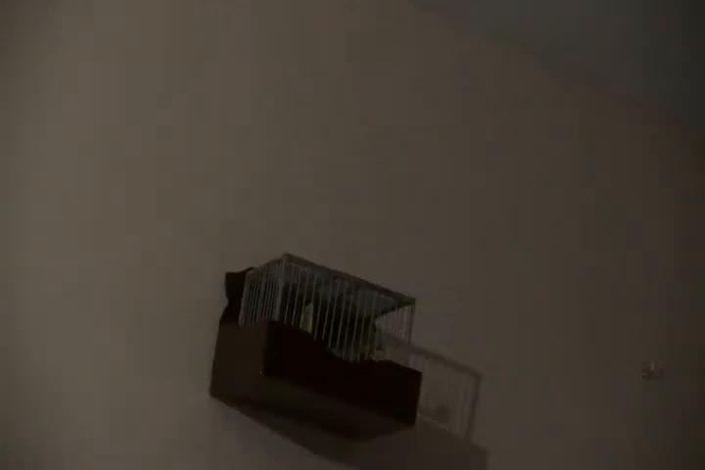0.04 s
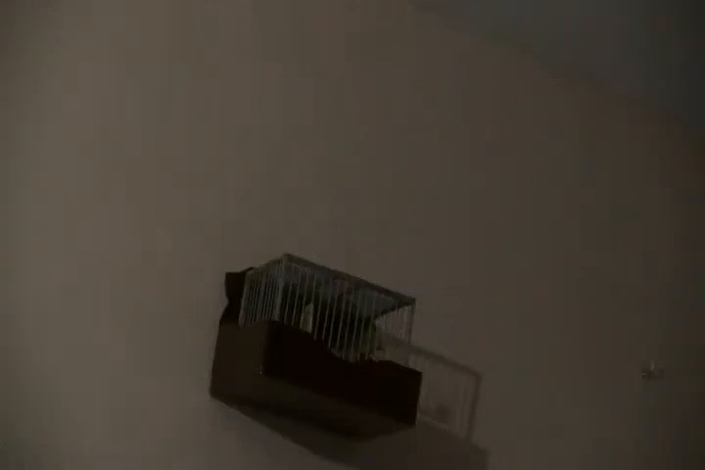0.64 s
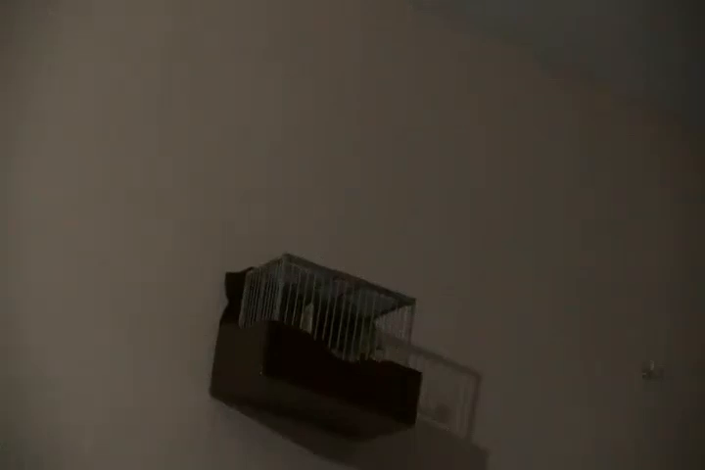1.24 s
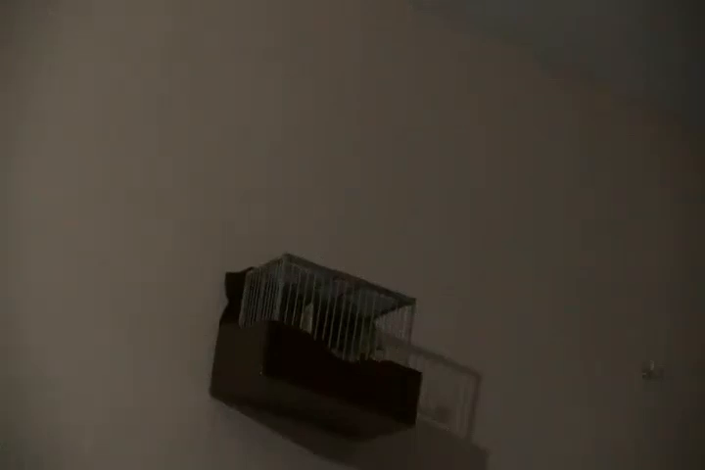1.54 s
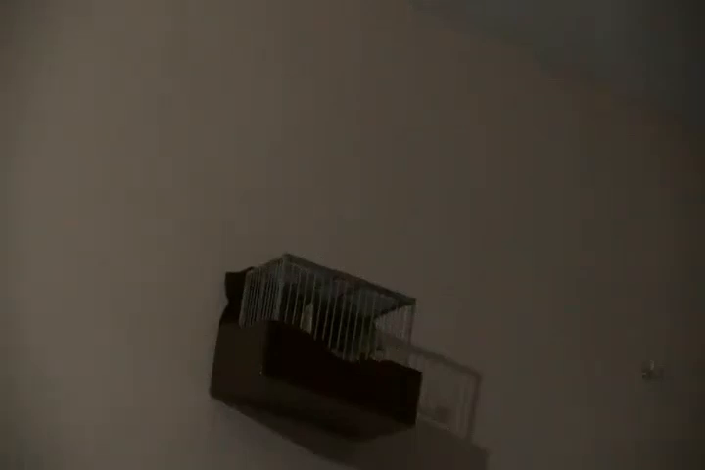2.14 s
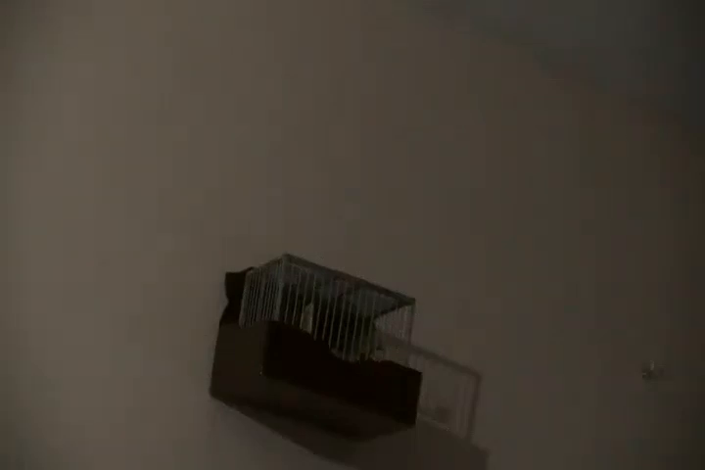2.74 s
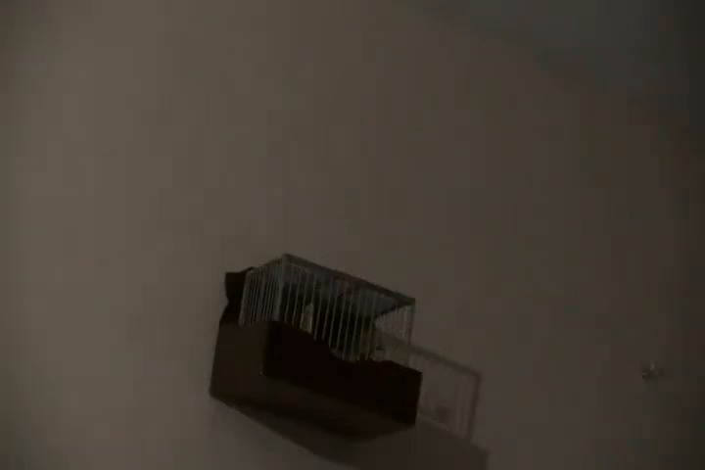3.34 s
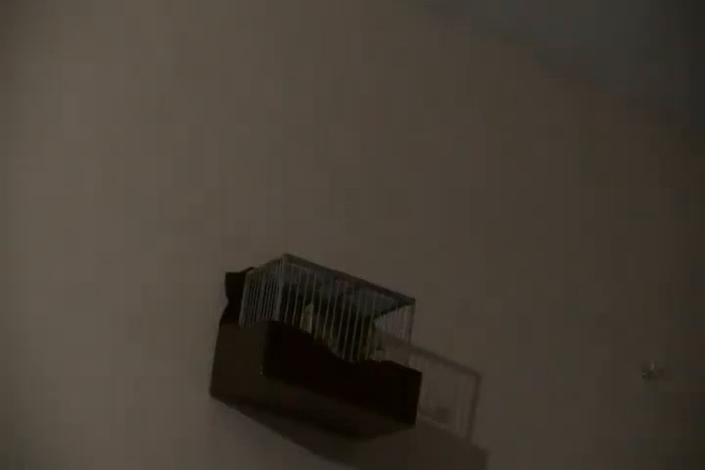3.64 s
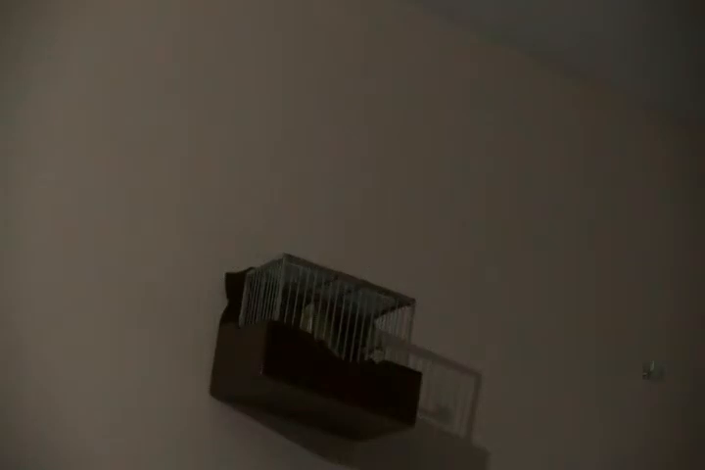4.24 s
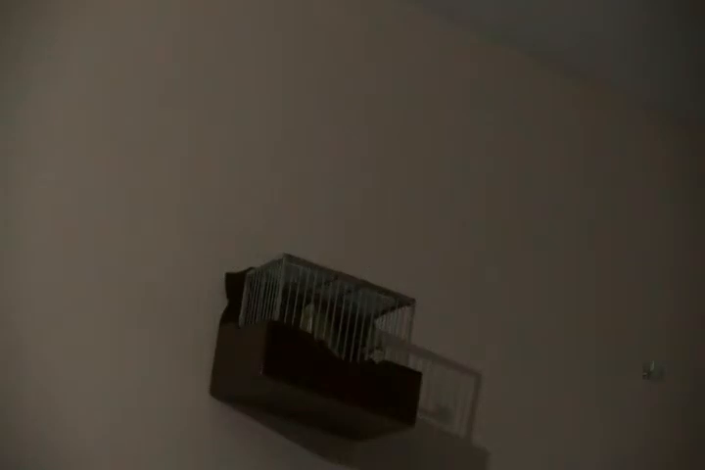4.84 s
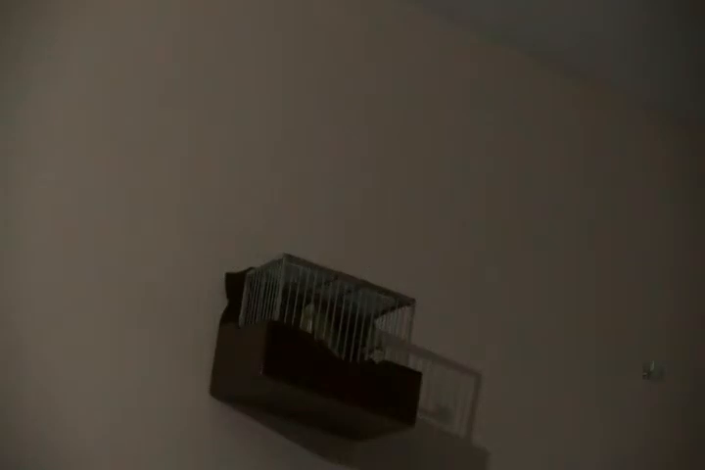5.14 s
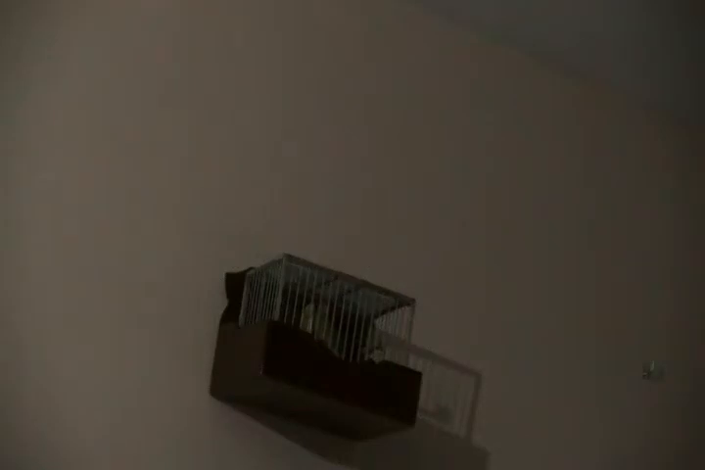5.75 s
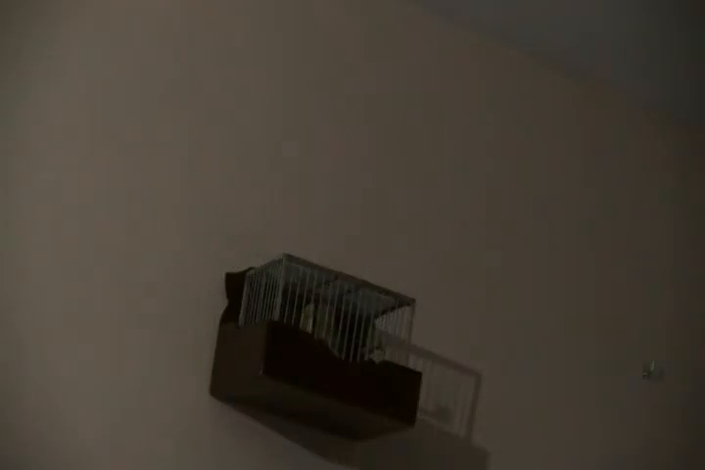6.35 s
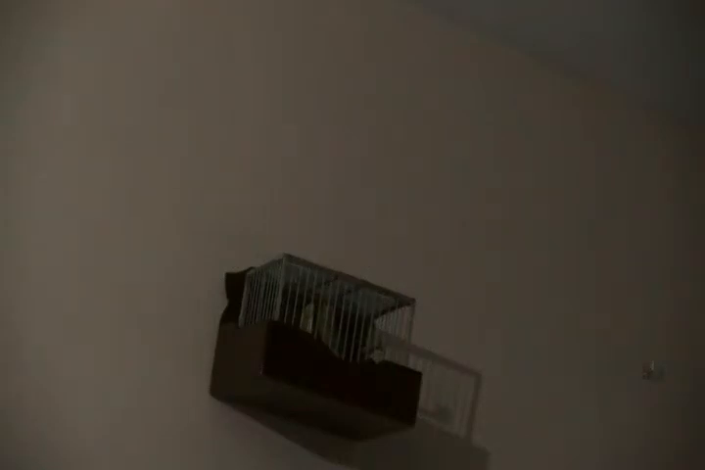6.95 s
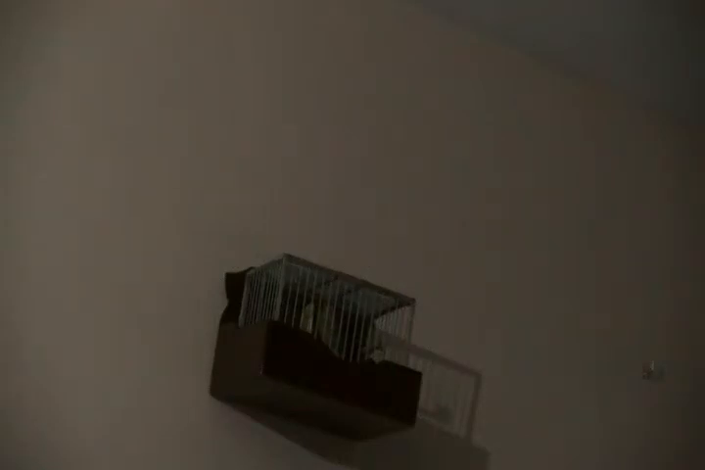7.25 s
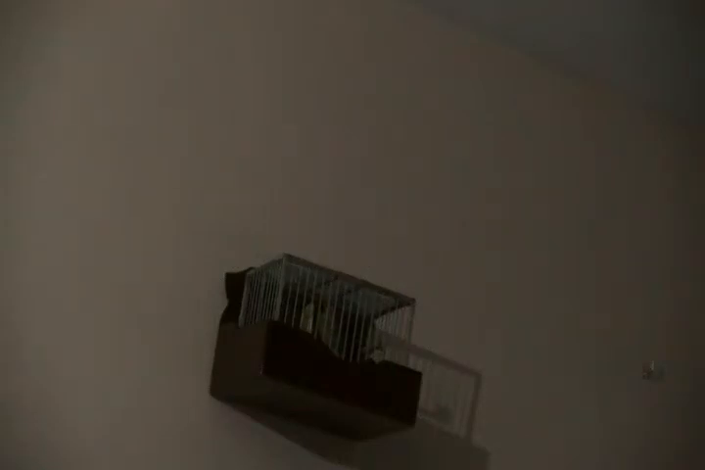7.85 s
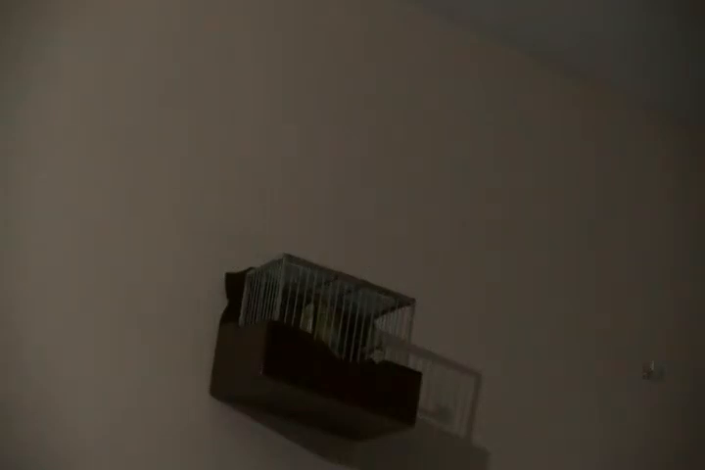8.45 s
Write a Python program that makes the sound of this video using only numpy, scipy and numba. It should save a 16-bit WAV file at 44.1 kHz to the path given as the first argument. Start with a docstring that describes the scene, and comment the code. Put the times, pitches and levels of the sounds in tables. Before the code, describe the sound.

A caged songbird sings short, high chips and downward-sliding notes, growing louder in an echoing room, with a fainter bird chirping farther off.

```python
"""A bare, echoing room with a steady rumble and mains hum. A far bird chirps softly, and a caged
songbird sings chip-and-whistle pairs, then loud notes that slide down, with a few small ticks.
Each note is one gliding tone from the bird's voice organ, which the walls smear into a wash.
A camera's gain control turns the whole room down under every loud note."""
import sys
import numpy as np
from scipy import signal
from scipy.fft import rfft, irfft, next_fast_len
from scipy.io import wavfile
from scipy.ndimage import uniform_filter1d, minimum_filter1d, map_coordinates
from numba import njit

SR = 44100
rng = np.random.default_rng(int(sys.argv[2]) if len(sys.argv) > 2 else 0)


def store_wav(level_fs):
    """Save 16-bit WAV to argv[1]."""
    pcm = np.round(np.clip(np.atleast_2d(level_fs), -1, 1) * 32767)
    wavfile.write(sys.argv[1], SR, pcm.T.astype(np.int16))


N = 374708
TIME = np.arange(N) / SR

# How alike the left and right sides sound: frequency_hz, likeness (1 = the same)
STEREO_LIKENESS = [(100, .99), (500, 0.98), (1200, .88), (3000, 0.83), (8000, 0.4), (12000, 0.12)]
# Tone colour of the room's rumble: frequency_hz, gain_db
RUMBLE_COLOUR = [(20, -20), (31, -9.5), (40, 4), (52, -2), (95, -2), (135, -1), (170, -4.5), (380, -6.5),
                 (550, -12), (1160, -17), (3000, -23.5), (5200, -25), (9800, -36), (12800, -46)]
# Tones of a mains-driven motor: pitch_hz, relative_level_db
HUM_TONES = [(199.2, -44), (349.9, -48), (500.6, -48), (597.5, -49), (802.1, -53.5), (899.0, -61),
             (952.8, -69.5), (1050, -63.5), (1599, -57)]
# Time the room's echo takes to fade by 60 dB, before any stretching: frequency_hz, fade_s
ECHO_FADE = [(3500, 0.59), (5500, 0.55), (8500, 0.46), (12000, 0.33)]
# The far bird's two-humped chirps: start_s, length_s, level_db, top_hz, low_hz
FAR_CHIRPS = [(.0, 0.15, -36, 6350, 3724), (0.8, .16, -36, 6450, 3880), (1.25, 0.1, -46.5, 4940, 3400),
              (1.751, 0.16, -35, 6540, 3900), (2.333, 0.067, -47.5, 4740, 3390),
              (2.755, .16, -35, 6340, 3900), (3.605, .16, -35.5, 6240, 3850),
              (4.394, 0.12, -33.5, 6350, 4040), (7.122, .14, -35, 6360, 3900),
              (8.058, 0.098, -35, 6310, 3850)]
# Tone colour of the path from the far bird: frequency_hz, gain_db
FAR_COLOUR = [(3500, 2.5), (4000, 4), (4450, 2), (4950, 5), (5350, 4.5), (5800, 9), (6050, 0), (6400, 0.5),
              (8000, -3)]
# Brief ticks and scuffs: start_s, level_db, fade_s (time to fall by 60 dB)
TICKS_AND_SCUFFS = [(0.506, -40, 0.073), (3.921, -33.5, 0.18), (3.962, -13, 0.0024), (5.203, -14.5, 0.002),
                    (6.341, -21, 0.002), (7.729, -10, 0.002)]
# Tone colour of the ticks and of the rasp in each note: frequency_hz, gain_db
RASP_COLOUR = [(1000, -11), (4000, 0), (7000, -1), (10500, 6), (13000, -19)]
# Short high chips: start_s, length_s, level_db, overtone_db, start_hz, crest_hz, end_hz
CHIP_NOTES = [(3.015, 0.023, -8.5, -15, 7030, 7400, 5550), (3.411, 0.034, -2.5, -22, 8170, 8520, 6180),
              (3.905, 0.032, -7, -25, 7580, 7760, 6660), (4.443, 0.036, 2, -31, 7230, 7800, 6610),
              (4.742, 0.029, 7, -31, 7300, 7880, 6610), (5.286, 0.023, 7, -55, 7450, 8410, 7980),
              (5.800, .037, 6.5, -35, 8640, 8910, 7900), (6.439, .017, 9.5, -49, 6720, 8725, 7800),
              (7.059, 0.041, 11, -39.5, 8760, 8870, 7860), (7.788, 0.022, 10.5, -44, 7450, 8470, 8320),
              (8.317, .038, 13.5, -33, 9040, 9200, 8190)]
# Lower, held whistles: start_s, length_s, level_db, overtone_db, start_hz, crest_hz, end_hz
WHISTLE_NOTES = [(3.055, 0.011, -7.5, -13.5, 5020, 5750, 5170), (3.447, 0.048, -8, -19, 4960, 5760, 5320),
                 (3.948, 0.013, -4, -21, 4850, 5610, 5155), (4.475, 0.038, -3.5, -31, 5010, 5730, 5243),
                 (4.786, .035, 1, -25, 5400, 5730, 5585), (5.181, .065, -2.5, -26, 6390, 5936, 5370),
                 (6.332, 0.033, 6, -29.5, 5100, 5483, 5320), (7.680, 0.051, 3.5, -22, 5195, 5854, 5365)]
# Steep downward slides: start_s, length_s, level_db, overtone_db, end_hz
DIVE_NOTES = [(5.304, 0.032, 6, -57, 3665), (5.864, 0.055, 7, -23.5, 4680), (6.462, 0.038, 7, -54, 4020),
              (7.123, 0.057, 8, -39, 4800), (7.808, 0.032, 10.5, -55, 3610), (8.383, 0.051, 11, -52, 4870)]


def amp(db):
    """Turn decibels into a number to multiply by."""
    return 10 ** (np.asarray(db) / 20)


def unit(x):
    """Scale a sound so that its average power is 1."""
    return x / np.sqrt(np.mean(x ** 2) + 1e-20)


def along(table, hz):
    """Read between the rows of a frequency table, with octaves evenly spaced."""
    row_hz, values = np.transpose(table)
    return np.interp(np.log(hz + 1), np.log(row_hz + 1), values)


def ramp(t, start, end):
    """0 before start, 1 after end, a straight line in between."""
    return np.clip((t - start) / max(end - start, 1e-6), 0, 1)


def wobble(rate_hz, size):
    """A smooth curve through rate_hz random points a second."""
    points = rng.standard_normal(int(size * rate_hz / SR) + 4)
    return map_coordinates(points, [np.arange(size) * rate_hz / SR])


def filtered(x, response):
    """Multiply each frequency in a sound by response(hz)."""
    size = x.shape[-1]
    padded = next_fast_len(size + SR // 4)
    return irfft(rfft(x, padded) * response(np.fft.rfftfreq(padded, 1 / SR)), padded)[..., :size]


def coloured(x, colour):
    """Shape a sound with a tone colour table."""
    return filtered(x, lambda hz: amp(along(colour, hz)))


def surrounding_noise(size):
    """Noise from all around: left and right are alike in the bass, less so in the treble."""
    def shares(hz):
        angle = np.arccos(np.clip(along(STEREO_LIKENESS, hz), -1, 1)) / 2
        return np.array([np.cos(angle), np.sin(angle)])
    mid, side = filtered(rng.standard_normal((2, size)), shares)
    return np.array([mid + side, mid - side])


def rumble_and_hum(rumble_db=-34.5, drone_db=-40, drone_hz=68, width_hz=5, hum_gain_db=-1, drift=.46):
    """A steady rumble, a low drone that swells and sinks, and a mains-driven motor's wavering hum."""
    rumble = unit(coloured(surrounding_noise(N), RUMBLE_COLOUR))
    drone = unit(filtered(rng.standard_normal(N), lambda hz: 1 / (1 + ((hz - drone_hz) / width_hz) ** 2)))
    hum = sum(amp(db) * np.sqrt(2) * np.sin(2 * np.pi * hz * TIME + drift * wobble(5, N))
              for hz, db in HUM_TONES)
    return amp(rumble_db) * rumble + amp(drone_db) * drone + amp(hum_gain_db) * hum


def add(track, start_s, sound):
    """Mix a stereo sound into the track."""
    part = track[:, max(round(start_s * SR), 0):][:, :sound.shape[1]]
    part += sound[:, :part.shape[1]]


def room(sound, direct_db, echo_stretch=1, early_db=4, early_s=.075, build_s=.0036):
    """The straight path plus wall echoes, new for each sound, as when a bird turns its head."""
    hz, t, spectrum = signal.stft(surrounding_noise(SR), SR, nperseg=256)
    fade_s = echo_stretch * along(ECHO_FADE, hz)[:, None]
    echo = signal.istft(spectrum * amp(-60 * t / fade_s), SR, nperseg=256)[1]
    t = np.arange(echo.shape[1]) / SR
    echo *= amp(early_db * np.exp(-t / early_s)) * (1 - np.exp(-t / build_s))  # strong first bounces
    echo /= np.linalg.norm(echo[0])
    echo[:, 0] += amp(direct_db)  # the straight path
    return signal.fftconvolve(sound[None], echo, axes=1)


def sing(shape, notes, flutter, direct_db, echo_stretch=1, flutter_hz=500, rasp_db=-33):
    """A bird's voice organ makes nearly pure tones; flutter is the share by which the pitch shakes."""
    edge_s, rasp_s = .00098, .06
    song = np.zeros((2, N))
    for start_s, length_s, level_db, *settings in notes:
        t = np.arange(int(length_s * SR)) / SR
        pitch, effort_db, overtone_db = shape(t, length_s, *settings)
        shake = 1 + flutter * wobble(flutter_hz, SR // 4)[:len(t)]
        phase = 2 * np.pi * np.cumsum(pitch * shake) / SR
        tone = np.sin(phase) + amp(overtone_db) * np.sin(2 * phase)
        swell = amp(level_db + effort_db) * np.clip(np.minimum(t, length_s - t) / edge_s, 0, 1)
        add(song, start_s, room(swell * tone, direct_db, echo_stretch))
        # a faint rasp with no echo sharpens the start, more so when the overtone is strong
        rasp = unit(coloured(surrounding_noise(SR // 4), RASP_COLOUR))[:, :len(t)]
        add(song, start_s, amp(rasp_db + .16 * overtone_db) * swell * np.exp(-t / rasp_s) * rasp)
    return song


def effort(t, length_s, attack_s, hold_share, soft_db, fade_db):
    """A note's level in dB: it swells from a soft start and fades after hold_share of its length."""
    return soft_db * (1 - ramp(t, 0, attack_s)) + fade_db * ramp(t, hold_share * length_s, length_s)


def chirp(t, length_s, top_hz, low_hz, split=.74, stress_db=7, buzz_hz=130, overtone_db=-30):
    """A tall hump of pitch, then a short, low, stressed one; a fast trill makes both buzz."""
    split_s = split * length_s
    tall_hump = np.sin(np.pi * ramp(t, 0, split_s))
    low_hump = .55 * np.sin(np.pi * ramp(t, split_s, length_s))
    trill = 1 - .16 * (1 + np.sin(2 * np.pi * buzz_hz * t))
    pitch = low_hz + (top_hz - low_hz) * (tall_hump + low_hump) * trill
    swell_db = effort(t, length_s, attack_s=.028, hold_share=.25, soft_db=-4, fade_db=-5.5)
    stress = ramp(t, split_s - .1 * length_s, split_s)
    return pitch, swell_db + stress_db * stress, overtone_db


def far_bird():
    """Soft, rough chirps from farther off, heard mostly by way of the walls."""
    chirps = sing(chirp, FAR_CHIRPS, flutter=.0254, direct_db=-11.5, echo_stretch=2.06, flutter_hz=700)
    return coloured(chirps, FAR_COLOUR)


def ticks():
    """Bursts of noise that die fast: two faint scuffs, and sharp ticks on some of the whistles."""
    track = np.zeros((2, N))
    t = np.arange(SR // 5) / SR
    for start_s, level_db, fade_s in TICKS_AND_SCUFFS:
        noise = unit(coloured(rng.standard_normal(len(t)), RASP_COLOUR))
        add(track, start_s, room(noise * amp(level_db - 60 * t / fade_s), direct_db=3.5))
    return track


def arch(t, length_s, crest_s, start_hz, crest_hz, end_hz):
    """Pitch that scoops to its crest, then eases over to the end pitch."""
    scoop = (1 - ramp(t, 0, crest_s)) ** 2
    sag = np.sin(np.pi / 2 * ramp(t, crest_s, length_s)) ** 1.6
    return crest_hz + (start_hz - crest_hz) * scoop + (end_hz - crest_hz) * sag


def chip(t, length_s, overtone_db, *pitches_hz, crest_s=.008):
    """A quick flick up in pitch, fading as the pitch sags."""
    pitch = arch(t, length_s, crest_s, *pitches_hz)
    swell_db = effort(t, length_s, attack_s=.0081, hold_share=.53, soft_db=-9, fade_db=-15)
    return pitch, swell_db, overtone_db


def whistle(t, length_s, overtone_db, *pitches_hz, crest_share=.45):
    """A gentle bend in pitch that stays loud to the end."""
    pitch = arch(t, length_s, crest_share * length_s, *pitches_hz)
    swell_db = effort(t, length_s, attack_s=.0063, hold_share=1, soft_db=-12.5, fade_db=0)
    return pitch, swell_db, overtone_db


def dive(t, length_s, overtone_db, end_hz, from_hz=7900, settle_s=.015, steepness=1.46, drop_db=-9):
    """The pitch plunges about an octave and settles; the voice weakens as it gets lower."""
    height = np.exp(-(t / settle_s) ** steepness)
    pitch = end_hz + (from_hz - end_hz) * height
    swell_db = effort(t, length_s, attack_s=.012, hold_share=.049, soft_db=-.5, fade_db=-6)
    return pitch, swell_db + drop_db * (1 - height), overtone_db


def caged_bird():
    """Clean, loud phrases: each chip leads into a whistle or a dive."""
    chips = sing(chip, CHIP_NOTES, flutter=.005, direct_db=-7.5, rasp_db=-32)
    whistles = sing(whistle, WHISTLE_NOTES, flutter=.002, direct_db=-7.5)
    dives = sing(dive, DIVE_NOTES, flutter=.005, direct_db=-13)
    return chips + whistles + dives


@njit
def gain_cut_db(excess_db, attack_s, release_db_per_s):
    """How far the gain control turns down: it closes in on the excess, then lets go steadily."""
    cut, now = np.zeros(len(excess_db)), 0.0
    for i in range(len(excess_db)):
        if excess_db[i] > now:
            now += (excess_db[i] - now) / (attack_s * SR)
        else:
            now = max(now - release_db_per_s / SR, excess_db[i])
        cut[i] = now
    return cut


def mirror_treble(x, edge_hz=12000, mirror_db=-7):
    """The camera's converter reflects the treble just under edge_hz to just above it."""
    below = signal.hilbert(filtered(x, lambda hz: hz < edge_hz))
    reflection = np.real(below * np.exp(-2j * np.pi * 2 * edge_hz * TIME))
    return x + amp(mirror_db) * reflection


def scene():
    """Both birds, the small ticks and the room's rumble and hum."""
    return caged_bird() + far_bird() + ticks() + rumble_and_hum()


def record(dry, ceiling_db=-5.5, top_hz=12990):
    """Gain control turns loud moments down; the highest treble is mirrored, then cut off."""
    peak = -minimum_filter1d(-np.abs(dry).max(axis=0), size=256)  # the loudest sample nearby
    excess_db = np.maximum(20 * np.log10(peak + 1e-9) - ceiling_db, 0)
    gain = amp(-gain_cut_db(excess_db, attack_s=.022, release_db_per_s=115))
    # a fast limiter catches peaks that arrive before the gain has come down
    limiter = uniform_filter1d(np.minimum(1, .97 / (peak * gain + 1e-9)), size=64)
    return filtered(mirror_treble(dry * gain * limiter), lambda hz: hz < top_hz)


dry = scene()
out = record(dry)
store_wav(out)
```